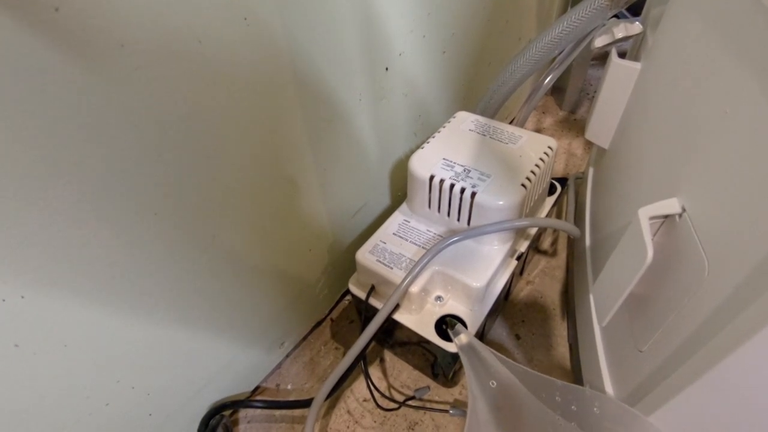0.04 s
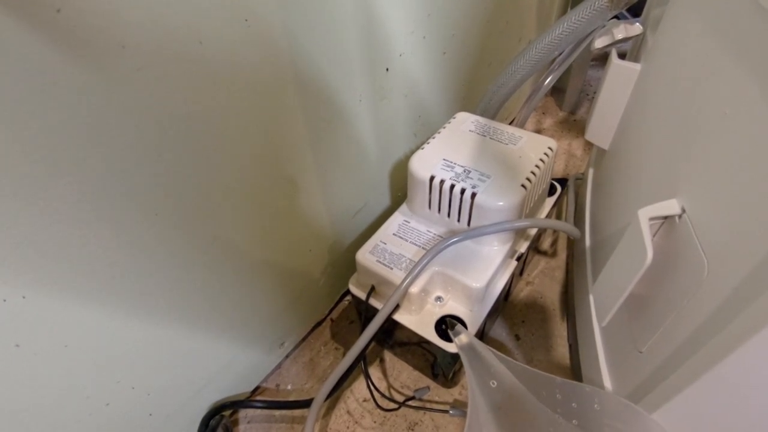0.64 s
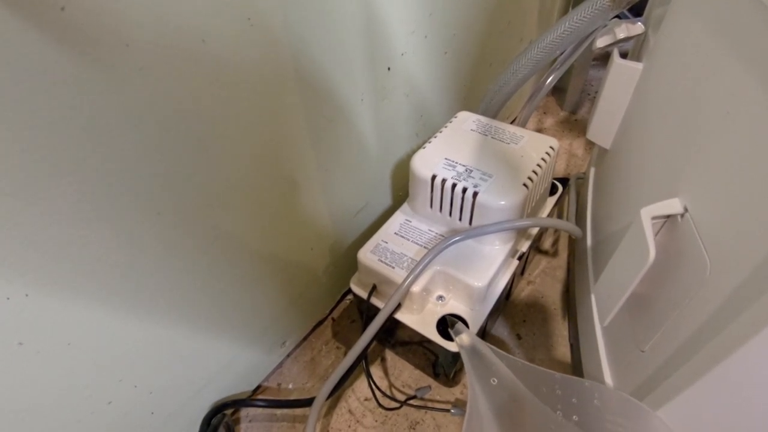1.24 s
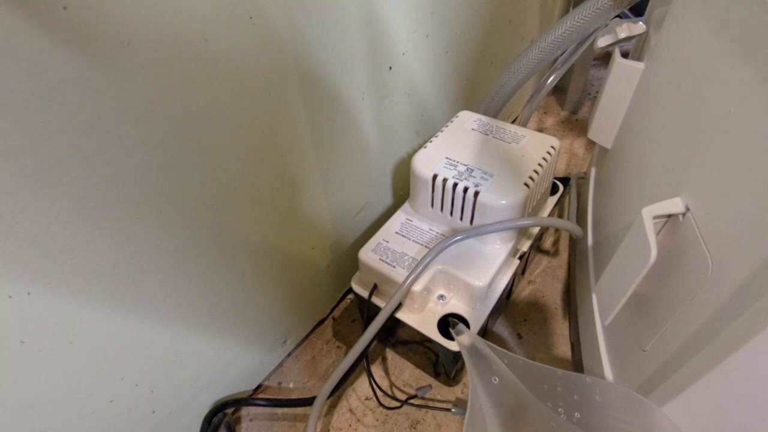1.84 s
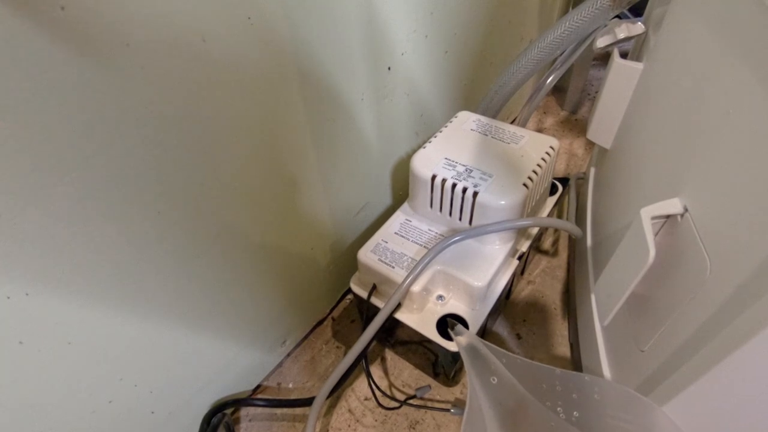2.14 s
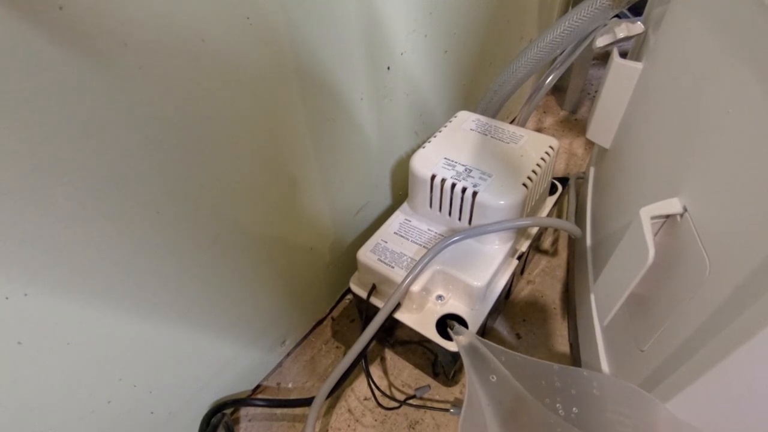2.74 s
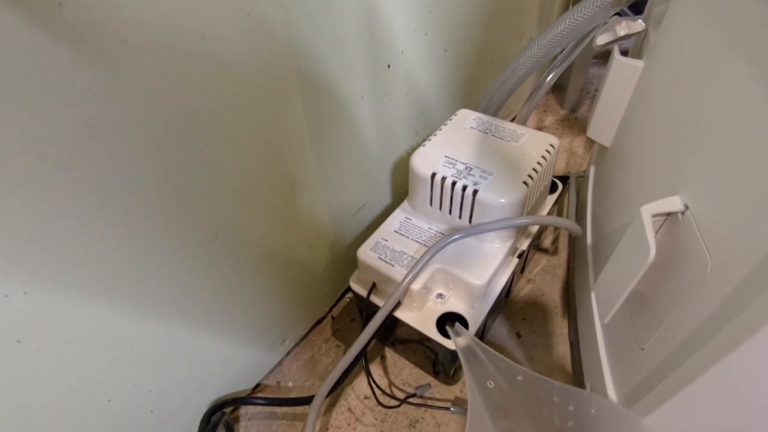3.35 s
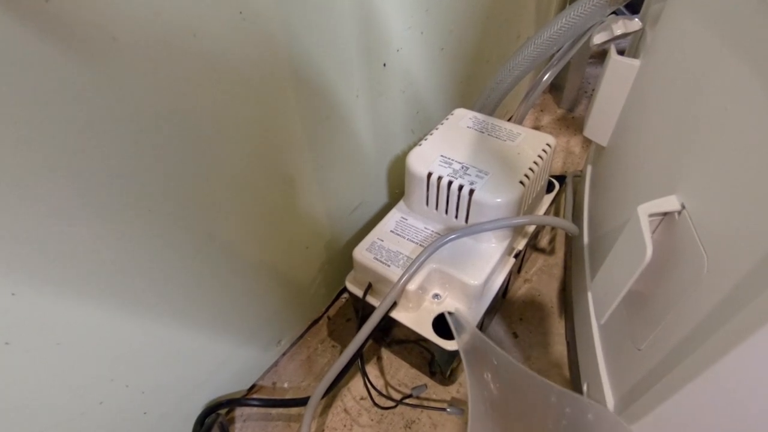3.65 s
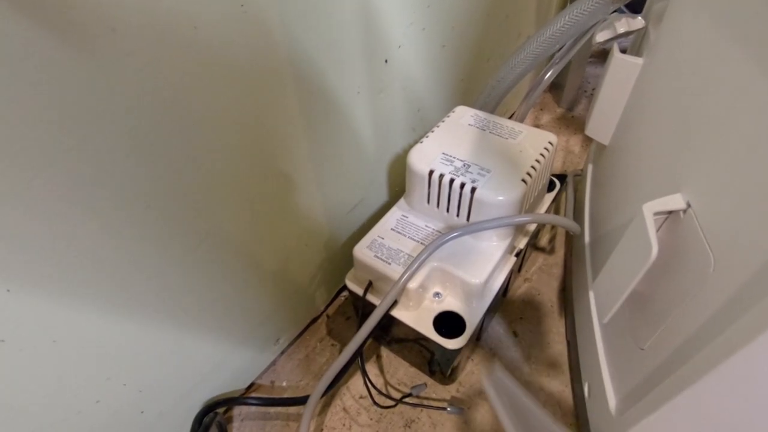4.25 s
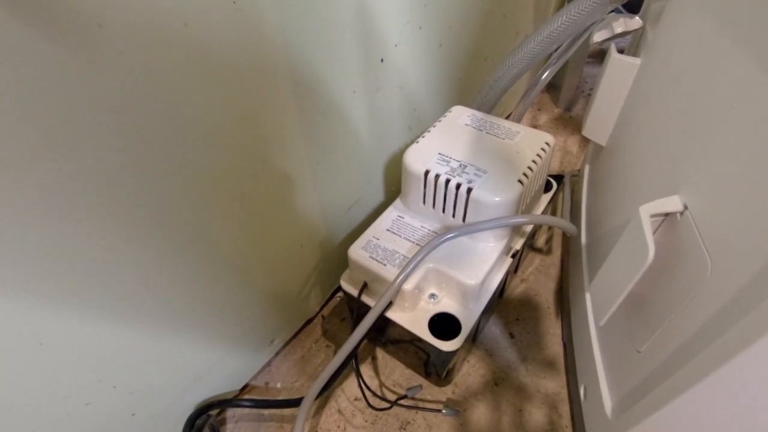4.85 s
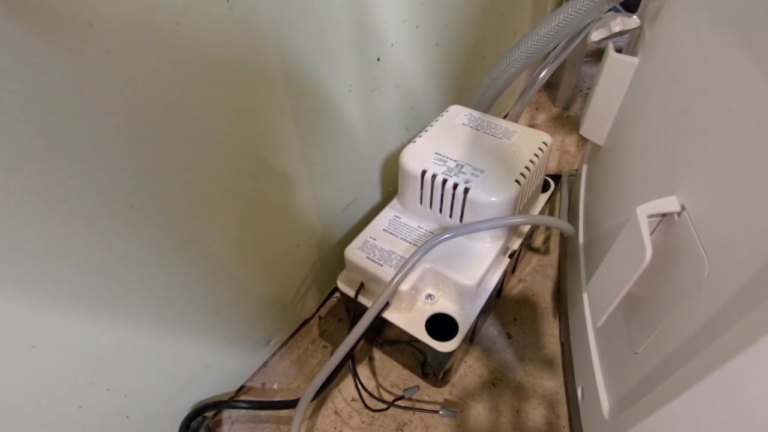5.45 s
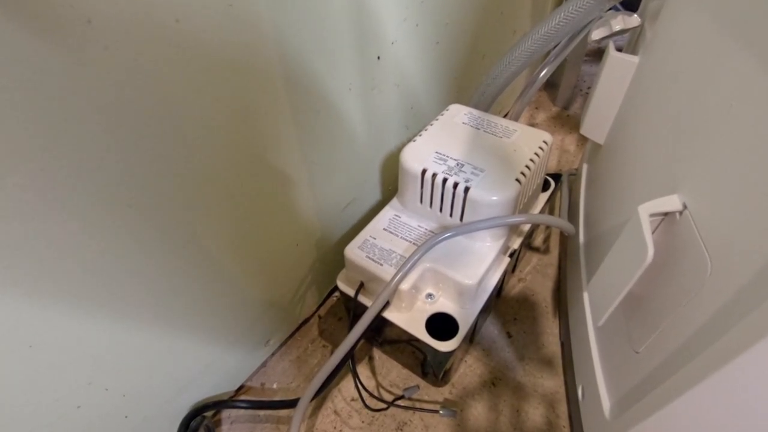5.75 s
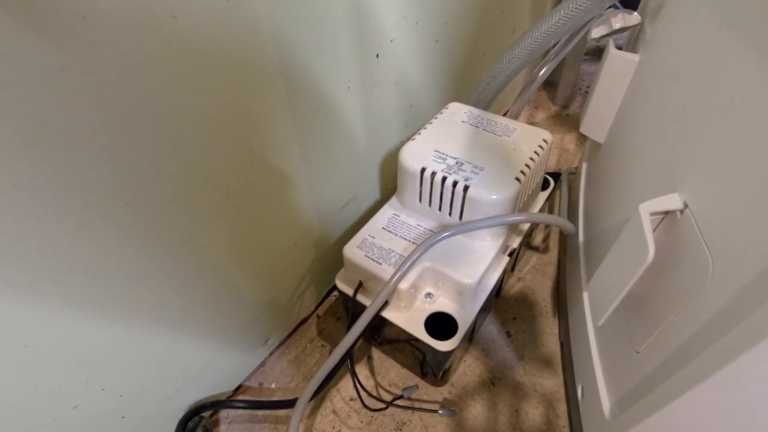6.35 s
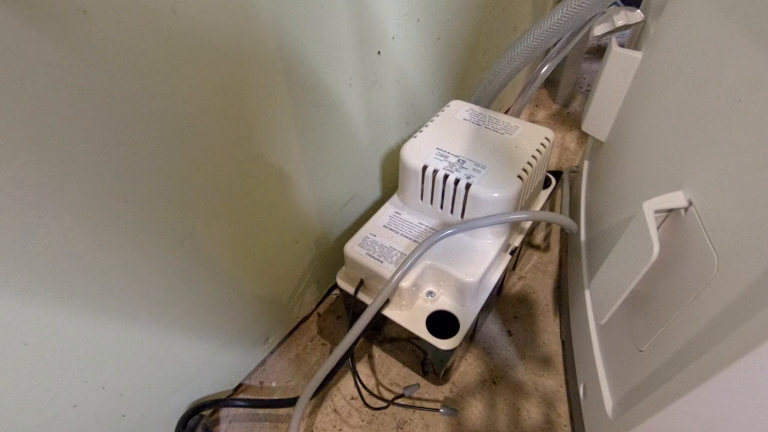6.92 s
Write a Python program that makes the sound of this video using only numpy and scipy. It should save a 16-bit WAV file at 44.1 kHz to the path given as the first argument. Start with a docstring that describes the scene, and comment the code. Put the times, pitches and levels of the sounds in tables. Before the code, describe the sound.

For the first 2.7 seconds there is only the low drone of a quiet garage, with faint rustles at the start, a small dry tick near 1 second and soft low bumps, the clearest around 2.5 seconds. At about 2.7 seconds a switch snaps sharply on a small electric pump, slightly right of the microphone. A few quick knocks and scraping ticks follow as the motor hums, growls briefly and spins up. By about 3.2 seconds it runs steadily: a low electric hum, a strong mid-pitched tone and a higher whine over churning water, all coloured by a hollow plastic housing. A light rattle, scattered bubble clicks, small gulps and very faint droplet spits run through it. The housing knocks once near 4.5 seconds. The whine swells a little around 6 seconds, and the pump is still running at the end, about 7 seconds in.

```python
"""A quiet garage, with a small condensate pump in the corner, a little right of the microphone.
At first there is only low room drone, with a few faint rustles, soft bumps and ticks. Then the float
switch snaps, the mains motor hums and spins up, the six-bladed impeller sings over churning water
and a whine settles near 1 kHz. The plastic housing colours the churn and a light rattle."""
import sys
import numpy as np
from scipy import signal
from scipy.fft import rfft, irfft, next_fast_len
from scipy.io import wavfile
from scipy.ndimage import uniform_filter1d

SR = 44100
rng = np.random.default_rng(int(sys.argv[2]) if len(sys.argv) > 2 else 0)


def put_to_file(sound):
    """Save the sound as 16-bit audio at rate SR, in the file named by the first command-line argument."""
    columns = np.atleast_2d(sound).T  # one column per channel
    safe = np.clip(columns, -1, 1)
    whole_steps = np.round(safe * 32767)
    wavfile.write(sys.argv[1], SR, whole_steps.astype(np.int16))


N = 312228
TIME = np.arange(N) / SR
HZ = np.maximum(np.arange(N // 2 + 1) * SR / N, 1)
MAINS_HZ, ROTOR_SLOTS, BLADES = 60, 17, 6
SWITCH_S = 2.739

# Levels are relative within a table; lengths and widths of swells run from the centre outwards.
# room tone of the garage, spectrum: f/Hz, level/dB
ROOM_TONE = [(25, -23.5), (45, 2), (100, -1), (200, 0.5), (260, -17), (550, -26.5), (760, -15),
             (1050, -25.5), (2500, -32.5), (6000, -37), (10000, -43.5), (15000, -56.5)]
# steady tones in the room: f/Hz, level/dB
ROOM_DRONE = [(59.8, -58.5), (119, -77), (199, -66)]
# stereo width of the room: f/Hz, side minus mid/dB
ROOM_WIDTH = [(60, -14), (110, -2.5), (200, -3.5), (380, 3), (750, 9), (1290, 7), (2400, 1.5), (3500, -2.5),
              (6000, 1), (14000, -2)]
# stereo width of the pump's corner: f/Hz, side minus mid/dB
PUMP_WIDTH = [(50, -14.5), (110, -28), (200, -28), (380, -28), (600, -6), (800, -13), (1290, -8.5),
              (2400, -7.5), (3300, -17), (4400, -6.5), (7500, 0.5), (14000, 0.5)]
# the pump sits a little right of the microphone: f/Hz, left minus right/dB
PUMP_BALANCE = [(60, -1.5), (200, 0), (380, 2), (700, -3), (1290, -2), (2400, -2), (4400, -1), (7000, 0),
                (9500, -2.5), (12000, 0.5)]
# faint rustles and scuffs: t/s, level/dB, length/s, centre f/Hz, width/octaves
RUSTLES = [(0.02, -69.5, 0.13, 1900, 1.3), (0.243, -57, 0.004, 640, 0.58), (0.245, -65, .005, 2600, 1.3),
           (0.26, -67, .012, 1900, .35), (0.285, -70.5, 0.1, 2000, 1.4), (1.0, -71.5, 0.074, 4800, 0.71)]
# soft low bumps: t/s, level/dB, length/s, centre f/Hz, width/octaves
BUMPS = [(0.365, -44.5, 0.009, 125, 0.5), (0.94, -48, 0.015, 65.4, 0.62), (2.52, -51, 0.015, 94.5, 0.62),
         (2.56, -39.5, 0.036, 54.5, 0.66), (2.64, -50, 0.066, 55, 0.67)]
# small dry ticks, then the scraping of the first turns: t/s, level/dB, ring f/Hz, t60/s
TICKS = [(1.0504, -38.5, 7000, 0.081), (2.6594, -69, 3520, 0.029), (2.882, -58, 6260, 0.05),
         (2.905, -48, 7300, 0.056), (2.9305, -46.5, 5230, .06), (2.9713, -44, 7150, 0.028)]
# spectrum of a tick: f/Hz, level/dB
TICK_COLOUR = [(500, -16), (2200, -25), (2700, -10), (4500, -5.5), (6000, 9), (7200, 13.5), (8600, -4),
               (9400, -2.5), (10700, -7), (11600, -22), (13300, -14), (15500, -29)]
# the switch lever touches, snaps and rebounds; the shaft takes up its play; the housing knocks once:
# t/s, level/dB, treble cut f/Hz, t60/s
KNOCKS = [(2.727, -53, 14000, 0.091), (2.739, -25.5, 14200, 0.069), (2.7459, -33, 3500, 0.055),
          (2.757, -31, 1800, 0.046), (2.783, -41, 1800, 0.033), (2.804, -42, 1500, 0.03),
          (2.8561, -31, 2570, 0.13), (2.865, -34, 2000, 0.1), (4.517, -27.5, 1500, 0.022)]
# spectrum of a knock's crack: f/Hz, level/dB
KNOCK_COLOUR = [(100, -33), (450, -11.5), (800, -5.5), (1300, -1), (2100, -6.5), (3400, -3), (4400, -11.5),
                (6000, -11.5), (9500, -15), (11500, -28), (15500, -33)]
# modes of the knocked housing: f/Hz, level/dB, t60/s
KNOCK_MODES = [(780, -11, 0.11), (1084, 0, 0.063), (1260, -12, 0.075), (1438, -5, 0.083), (1624, -11, 0.13),
               (1866, -17, .08), (2370, -24, 0.1), (2643, -8, 0.1), (2950, -20, 0.072), (3345, -2.5, 0.037),
               (3450, -6, 0.033), (3820, -8, 0.064), (4215, -1, 0.027), (4720, -5.5, 0.041),
               (5420, -5, 0.04), (8800, -4, 0.028)]
# magnetic hum: multiple of the mains, running level/dB, extra while starting/dB, build-up/s
HUM_HARMONICS = [(1, -56.5, 10, 0.17), (2, -46.5, 9, 0.35), (4, -43, -2.5, .1), (6, -46.5, 3.5, 0.16),
                 (8, -56.5, 10.5, 0.1)]
# the shaft runs up and levels off below the mains rate, shifting with the load: t/s, speed/(turns/s)
SHAFT_SPEED = [(2.77, 0), (2.96, 29.5), (3.04, 38), (3.1, 47), (3.14, 49.7), (3.21, 51.3), (3.4, 51.58),
               (4.4, 51.5), (5.15, 51.76), (6.2, 51.5)]
# tones of shaft and impeller: multiple of the shaft speed, level/dB
SHAFT_ORDERS = [(1, -52), (2, -55), (6, -28.5), (17, -46.5), (23, -55)]
# rotor slots beating with the mains: multiple of the slot rate, multiple of the mains, level/dB
SLOT_TONES = [(1, 2, -33), (2, 2, -58), (3, -2, -57.5)]
# the whine and the tank's ring swell for a while: t/s, level/dB
WHINE_SWELL = [(3.2, -5.5), (4.3, -3), (5.0, -1), (5.6, 2), (6.1, 2.5), (7.08, -2.5)]
# both dip briefly: t/s, level change/dB, length/s
WHINE_DIPS = [(3.607, -17, .025), (4.555, -12, .014), (5.007, -8, 0.022)]
# spectrum of churning water: f/Hz, level/dB
CHURN_COLOUR = [(25, -36.5), (40, -21), (52, -3.5), (100, -10.5), (190, 1.5), (450, -0.5), (750, -7),
                (1400, -10.5), (2200, -16.5), (3400, -21), (5000, -27), (8000, -39), (14000, -74)]
# housing resonances and the gaps between them: f/Hz, width/Hz, level/dB
HOUSING_RESONANCES = [(262, 19, -6), (334, 24, -3), (450, 43, -2), (539, 53, 3.5), (579, 25, -20),
                      (635, 22, 4.5), (650, 14, -9.5), (1034, 180, 11), (1218, 94, 5), (1262, 44, 0.5),
                      (1823, 186, 6.5), (2250, 86, -5), (2396, 240, 4.5), (2640, 41, 1.5), (2850, 320, 12),
                      (3800, 290, 4.5), (4270, 84, 6), (4400, 89, -7.5)]
# spectrum of the tank's main ring: f/Hz, level/dB
TANK_COLOUR = [(400, -70.5), (850, -23), (960, -2.5), (1020, 5), (1075, 11.5), (1140, 0.5), (1190, 11.5),
               (1235, 6), (1255, -8), (1450, -40), (3000, -92)]
# gulps of water make the tank ring harder: t/s, level/dB, length/s
GULPS = [(3.213, -36, 0.034), (3.513, -37, 0.017), (3.862, -32, .014), (3.95, -33, 0.019),
         (5.062, -26.5, 0.014), (5.136, -31.5, 0.019), (5.38, -32, 0.046), (5.827, -27.5, 0.013),
         (6.077, -25.5, 0.011), (6.529, -24.5, 0.012), (6.613, -26.5, 0.011), (6.974, -27.5, 0.015)]
# spectrum of the rattle: f/Hz, level/dB
RATTLE_COLOUR = [(300, -5), (1500, -11), (3400, 4), (5000, 0.5), (6800, -0.5), (8400, -16), (10000, -5.5),
                 (11500, -20.5), (14000, -23.5), (15500, -45.5)]
# the loudest clicks of single bubbles and loose plastic: t/s, level/dB
CLICKS = [(3.1987, -37), (3.436, -35), (3.494, -32), (3.81, -29), (4.467, -35), (4.7155, -34), (4.735, -31),
          (5.049, -26), (5.207, -28), (5.393, -28), (5.585, -32), (6.246, -31), (6.457, -28), (6.732, -36),
          (6.921, -24)]
# single droplets spit: t/s, level/dB
SPITS = [(3.402, -61), (5.345, -55), (5.388, -61), (5.458, -59), (5.702, -59), (6.01, -58), (6.356, -58),
         (6.41, -60), (6.468, -56), (6.542, -58)]
# brief hollow swells of the housing and a high fizz as the motor runs up:
# t/s, level/dB, length/s, centre f/Hz, width/octaves
SPIN_UP_SWELLS = [(2.962, -41, .03, 1000, .08), (2.985, -58.5, .06, 9800, .42),
                  (2.995, -38.5, .05, 625, .08), (3.08, -39, .04, 840, .2), (3.05, -35, .02, 215, .12)]
# the rattle flares in short bursts: t/s, level/dB, length/s, centre f/Hz, width/octaves
RATTLE_FLARES = [(3.177, -37, 0.016, 2770, .25), (3.497, -37, 0.014, 2700, 0.27),
                 (4.68, -40, 0.024, 2800, 0.22), (4.915, -41, 0.011, 2800, .25),
                 (5.05, -36.5, .012, 2500, .4), (5.085, -35, 0.015, 2800, .25)]


def from_db(db):
    """Decibels to gain."""
    return 10 ** (np.asarray(db) / 20)


def rms_one(x):
    """Scale to rms 1."""
    return x / np.sqrt(np.mean(x ** 2) + 1e-20)


def in_time(points):
    """Read a curve sample by sample."""
    return np.interp(TIME, *np.transpose(points))


def at_hz(points, hz):
    """Read a spectrum on a log-frequency axis."""
    point_hz, point_db = np.transpose(points)
    return np.interp(np.log(hz), np.log(point_hz), point_db)


def drift(rate):
    """A smooth random wander of rms 1, changing about rate times a second."""
    hop, settle = 40, 2000
    pole = np.exp(-2 * np.pi * rate * hop / SR)
    noise = rng.standard_normal(N // hop + settle + 2)
    slow = signal.lfilter([1], [1, -2 * pole, pole * pole], noise)[settle:]
    return np.interp(np.arange(N) / hop, np.arange(len(slow)), rms_one(slow))


def pan(hz):
    """Left and right gains of the pump at the microphone."""
    return from_db(at_hz(PUMP_BALANCE, hz) * np.array([[.5], [-.5]]))


def coloured(colour_db, drive=None, width=PUMP_WIDTH):
    """Give a mid and a side drive (white noise by default) a spectrum and a stereo image; rms 1."""
    drive = rng.standard_normal((2, N)) if drive is None else drive
    size = next_fast_len(N, True)
    hz = np.maximum(np.arange(size // 2 + 1) * SR / size, 1)
    mid, side = rfft(drive, size)
    stereo = mid + from_db(at_hz(width, hz)) * side * [[1], [-1]]
    place = pan(hz) if width is PUMP_WIDTH else 1   # room tone comes from all around
    spectrum = stereo * place * from_db(np.interp(hz, HZ, colour_db))
    return rms_one(irfft(spectrum, size)[:, :N])


def band_db(hz, octaves):
    """A band around hz with steep skirts."""
    return -20 * np.log10(1 + (np.log2(HZ / hz) / octaves) ** 4)


def tone(cycles):
    """A sine of rms 1 that follows a count of cycles."""
    return np.sqrt(2) * np.sin(2 * np.pi * (cycles + rng.random()))


def dying(s, t60, rise_s=0.00045):
    """A quick rise at time s and an exponential decay."""
    age = np.maximum(TIME - s, 0)
    return np.minimum(age / rise_s, 1) * np.exp(-np.log(1000) * np.minimum(age / t60, 10))


def bell(s, length):
    """A smooth rise and fall around time s."""
    return np.exp(-((TIME - s) / length) ** 2)


def shaft():
    """Shaft speed in turns per s, and the share of full speed still lacking (1 at rest)."""
    speed = in_time(SHAFT_SPEED)
    return speed, np.maximum(1 - speed / speed[-1], 0)


def starting_current(fades_s=3.48, release_s=0.06):
    """Share of the heavy starting current: 1 until it falls away around fades_s."""
    return np.clip((fades_s - TIME) / release_s + .5, 0, 1)


def hose_air(fill_s=0.89):
    """Share of air left in the hose: 1 until the switch snaps, then dying away."""
    return np.exp(-np.maximum(TIME - SWITCH_S, 0) / fill_s)


def whine_swell_db():
    """The slow swell and brief dips shared by the whine and the tank's ring."""
    return in_time(WHINE_SWELL) + sum(db * bell(s, length) for s, db, length in WHINE_DIPS)


def housing_db():
    """Response of the plastic housing and tank."""
    return sum(db * .5 ** ((2 * (HZ - hz) / width) ** 2) for hz, width, db in HOUSING_RESONANCES)


def garage(room_db=-56):
    """Low rumble and drone of machinery farther off in the building."""
    drone = sum(from_db(db) * tone(hz * TIME) for hz, db in ROOM_DRONE)
    return from_db(room_db) * coloured(at_hz(ROOM_TONE, HZ), width=ROOM_WIDTH) + drone


def swells(rows):
    """Soft bursts of band noise: rustles, bumps, spin-up swells or flares of rattle."""
    return sum(from_db(db) * bell(s, length) * coloured(band_db(hz, octaves))
               for s, db, length, hz, octaves in rows)


def ticks(ring_db=-9, ring_t60=0.21, ring_octaves=0.064, room_db=-16, room_t60=0.39):
    """Each tick is a bright snap, a narrow ring that outlasts it and a faint room tail."""
    out, snap = 0, coloured(at_hz(TICK_COLOUR, HZ))
    for s, db, hz, t60 in TICKS:
        ring = from_db(ring_db) * coloured(band_db(hz, ring_octaves)) * dying(s, ring_t60)
        decay = dying(s, t60) + from_db(room_db) * dying(s, room_t60)
        out = out + from_db(db) * (snap * decay + ring)
    return out


def knocks(ring_db=1, ring_builds_s=0.0058, room_db=-26, room_t60=0.54):
    """Switch and shaft knock: a short crack, the housing's ring and a faint tail off the walls."""
    out, age = 0, TIME[:SR // 2]
    for s, db, cut_hz, t60 in KNOCKS:
        decay = dying(s, t60) + from_db(room_db) * dying(s, room_t60)
        crack = coloured(at_hz(KNOCK_COLOUR, HZ)) * decay
        modes = sum(from_db(mode_db - 60 * age / mode_t60) * np.sin(2 * np.pi * (hz * age + rng.random()))
                    for hz, mode_db, mode_t60 in KNOCK_MODES)
        start, ring = int(s * SR), np.zeros(N)
        ring[start:start + len(age)] = from_db(ring_db) * np.minimum(age / ring_builds_s, 1) * modes
        treble_cut = signal.butter(1, cut_hz, fs=SR, output="sos")
        out = out + from_db(db) * signal.sosfilt(treble_cut, crack + ring * pan([1000]))
    return out


def motor_hum(flutter_db=3.5):
    """Once switched on, the motor's iron hums at multiples of the mains."""
    out = 0
    for multiple, db, extra_db, builds_s in HUM_HARMONICS:
        built = np.clip((TIME - SWITCH_S) / builds_s, 0, 1)
        level = from_db(db + extra_db * starting_current() + flutter_db * drift(5.2))
        out = out + built * level * tone(multiple * MAINS_HZ * TIME)
    return out


def frame_growl(level_db=-46.5, centre_hz=400, octaves=0.6, builds_s=0.08):
    """Under the starting current the motor frame chatters on its mount, twice in each mains cycle."""
    pulses = tone(MAINS_HZ * TIME) ** 4
    built = np.clip((TIME - SWITCH_S) / builds_s, 0, 1)
    chatter = coloured(band_db(centre_hz, octaves), pulses * rng.standard_normal((2, N)))
    return from_db(level_db) * built * starting_current() * chatter


def rotor(impeller_db=1.5, impeller_rise_db=30, whine_rise_db=36, muffle_db=6.5, flutter_db=1):
    """The blades sing, louder as the hose fills; the rotor slots beat with the mains and whine."""
    speed, lacking = shaft()
    turns = np.cumsum(speed) / SR + 0.0013 * drift(8.5)   # the water loads the shaft unevenly
    sing_db = impeller_db - impeller_rise_db * lacking
    whine_db = whine_swell_db() - whine_rise_db * lacking
    out = 0
    for order, db in SHAFT_ORDERS:
        air_loss_db = muffle_db * hose_air() * (order == BLADES)
        level = from_db(db + sing_db - air_loss_db + flutter_db * drift(18))
        out = out + level * tone(order * turns) * pan([order * speed[-1]])
    for slot_multiple, mains_multiple, db in SLOT_TONES:
        order = slot_multiple * ROTOR_SLOTS
        whine = tone(order * turns + mains_multiple * MAINS_HZ * TIME)
        out = out + from_db(db + whine_db) * whine * pan([order * speed[-1]])
    return out * (TIME > SWITCH_S)


def churn(running_db=-28, rise_db=26.5, flutter_db=0.64, turn_depth=0.081):
    """The impeller churns the water, louder with speed and a little harder once a turn."""
    speed, lacking = shaft()
    surge = from_db(flutter_db * drift(16.7)) * (1 + turn_depth * tone(np.cumsum(speed) / SR))
    level = from_db(running_db - rise_db * lacking) * (TIME > SWITCH_S)
    return level * surge * coloured(at_hz(CHURN_COLOUR, HZ) + housing_db())


def tank_ring(steady_db=-39.5, rise_db=40):
    """The tank rings near the whine, and harder at each gulp of water."""
    _, lacking = shaft()
    steady = from_db(steady_db + whine_swell_db() - rise_db * lacking) * (TIME > SWITCH_S)
    gulps = sum(from_db(db) * bell(s, length) for s, db, length in GULPS)
    ring = coloured(at_hz(TANK_COLOUR, HZ))
    local_rms = np.sqrt(uniform_filter1d(np.mean(ring ** 2, axis=0), size=1100))
    return np.hypot(steady, gulps) * ring / local_rms   # evened, so each gulp keeps its own strength


def rattle(base_db=-46.5, rise_db=25, calm_db=4.5, grains_per_s=8000, hiss=0.41, throb_depth=0.094,
           rub_db=-47.5, click_db=-8, click_t60=0.0065):
    """Dense tiny impacts of bubbles and loose plastic, easing as the hose fills; a few click louder."""
    speed, lacking = shaft()
    level = from_db(base_db - rise_db * lacking - calm_db * (1 - hose_air()))
    rub = from_db(rub_db) * bell(s=2.9, length=0.025)   # the shaft rubs as it starts to turn
    grains = (rng.random(N) < grains_per_s / SR) * rng.choice([-1, 1], (2, N))
    beat = tone(BLADES * np.cumsum(speed) / SR - 2 * MAINS_HZ * TIME)   # blades against the hum
    drive = (grains + hiss * rng.standard_normal((2, N))) * (1 + throb_depth * beat)
    colour = at_hz(RATTLE_COLOUR, HZ) + housing_db()
    clicks = sum(from_db(db + click_db) * dying(s, click_t60) for s, db in CLICKS)
    return (level + rub) * (TIME > SWITCH_S) * coloured(colour, drive) + clicks * coloured(colour)


def spatter(level_db=-78, drops_per_s=220, clump_db=3, drop_t60=.012, spit_t60=.06):
    """Tiny droplets burst in irregular clumps once the impeller turns; a few spit louder."""
    _, lacking = shaft()
    born = rng.random(N) < drops_per_s * from_db(clump_db * drift(3)) / SR
    sizes = born * np.minimum(rng.exponential(1, N), 3) * (1 - lacking)
    decay_per_sample = from_db(-60 / (drop_t60 * SR))
    bursts = signal.lfilter([1], [1, -decay_per_sample], sizes + 1e-18)
    spray = coloured(band_db(hz=9500, octaves=0.53), bursts * rng.standard_normal((2, N)))
    spits = sum(from_db(db) * dying(s, spit_t60) for s, db in SPITS)
    return from_db(level_db) * spray + spits * coloured(band_db(hz=11000, octaves=0.3))


def scene():
    """The room, its small sounds and the pump in the corner, as they reach the microphone."""
    room = garage() + swells(RUSTLES) + swells(BUMPS)
    mechanism = ticks() + knocks() + motor_hum() + frame_growl() + rotor()
    tank = churn() + tank_ring() + rattle() + spatter()
    return room + mechanism + tank + swells(SPIN_UP_SWELLS) + swells(RATTLE_FLARES)


def record(dry, cutoff_hz=15600):
    """The stereo microphone signal, with the top cut steeply."""
    return signal.sosfilt(signal.ellip(10, .1, 90, cutoff_hz, fs=SR, output="sos"), dry)


dry = scene()
out = record(dry)
put_to_file(out)
```